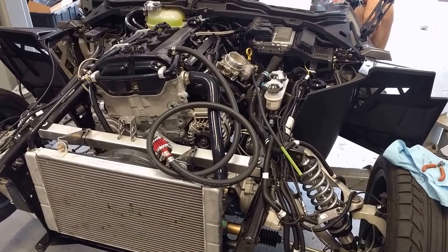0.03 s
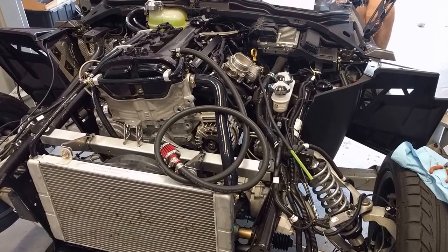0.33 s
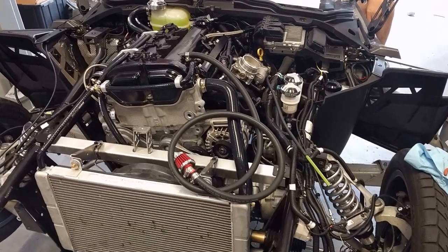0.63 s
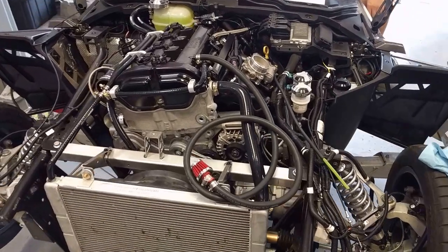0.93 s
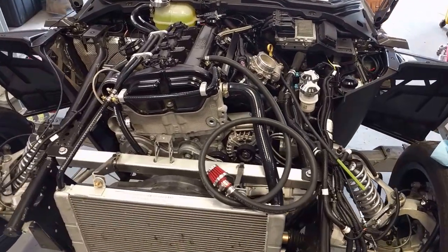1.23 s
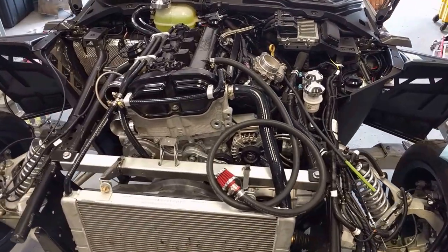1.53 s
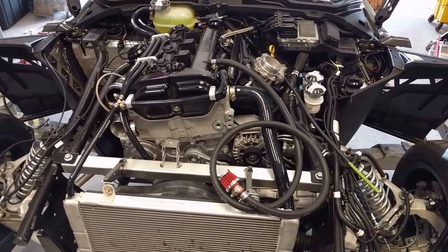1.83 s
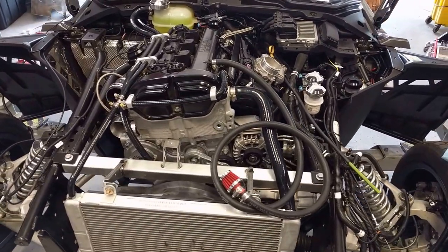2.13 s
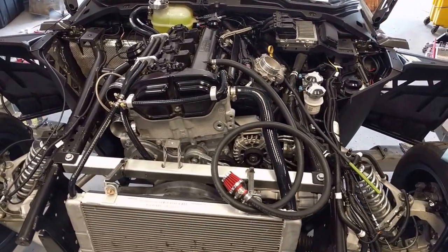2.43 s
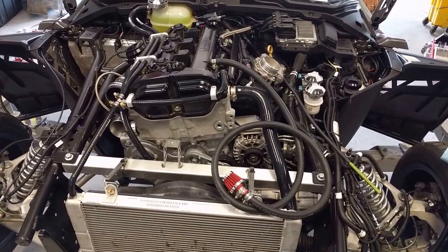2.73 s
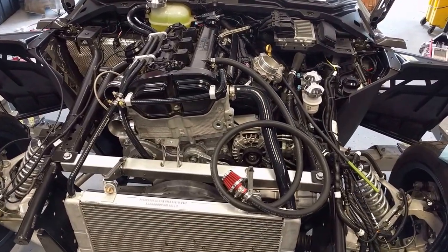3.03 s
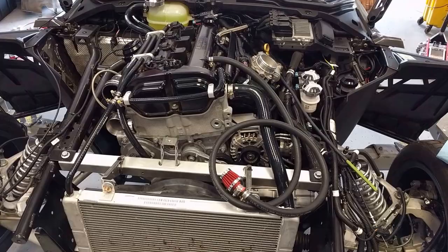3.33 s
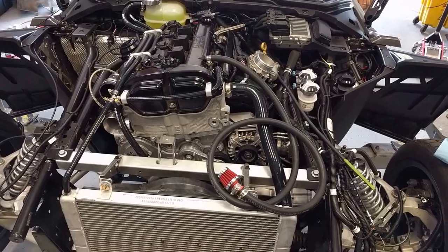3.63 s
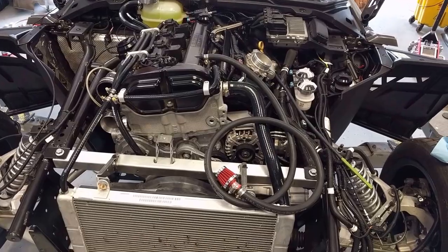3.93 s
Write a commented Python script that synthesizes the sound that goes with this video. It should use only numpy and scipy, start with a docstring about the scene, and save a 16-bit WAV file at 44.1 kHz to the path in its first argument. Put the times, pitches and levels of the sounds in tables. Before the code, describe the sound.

Heard from just above, an engine fires up after a quiet stretch of garage hum and buzz. A short starter grind leads into a rough exhaust roar that rises, dips and rises again, with ticking valves and metal clatter.

```python
"""A four-cylinder engine is started in a workshop, heard from just above the open engine bay.
First come room rumble, hiss, lamp buzz and an electric whine, with faint ringing, a ping and a knock.
At 1.9 s the starter clacks in and its pinion grinds on the ring gear while the cylinders puff air.
At 2.3 s the engine catches, then flares, sags and climbs to a fast idle. Each firing booms in the
silencer and barks in the pipe, while the valve gear ticks brightly and the block clatters."""
import sys
import numpy as np
from scipy import signal
from scipy.fft import rfft, irfft
from scipy.io import wavfile
from scipy.ndimage import uniform_filter1d

SR = 44100
rng = np.random.default_rng(int(sys.argv[2]) if len(sys.argv) > 2 else 0)


def transcribe(signal):
    """Save signal, clipped to [-1, 1], as a 16-bit WAV file at the path in sys.argv[1]."""
    frames = np.atleast_2d(signal).T
    limited = np.clip(frames, -1, 1)
    pcm = np.round(limited * 32767).astype(np.int16)
    wavfile.write(sys.argv[1], SR, pcm)


N = 176400
TIME_S = np.arange(N) / SR
CATCH_S, CATCH_RISE_S, HIT_RISE_S = 2.268, 0.0044, 0.0018


def undb(db):
    """Decibels to gain."""
    return 10 ** (np.asarray(db) / 20)

def unit(x):
    """Scale to rms 1."""
    return x / np.sqrt(np.mean(x ** 2) + 1e-18)

def unit_running(x):
    """Scale to rms 1 over the time the engine runs."""
    return x / np.sqrt(np.mean(x[int(CATCH_S * SR):] ** 2) + 1e-18)

def curve(rows):
    """Join (seconds, value) rows by straight lines."""
    return np.interp(TIME_S, *np.array(rows).T)

def noise():
    """White noise."""
    return rng.standard_normal(N)

def drift(rate_hz):
    """Smooth random motion of rms 1."""
    hold = int(SR / rate_hz)
    steps = np.repeat(noise()[:N // hold + 1], hold)
    return unit(uniform_filter1d(uniform_filter1d(steps, hold), hold)[:N])

def tone(hz, wander_hz=1.08, rate_hz=21.0, wander_db=1.2):
    """A sine unsteady in pitch and level, rms near 1."""
    gain = np.sqrt(2) * undb(wander_db * drift(14.63))
    return gain * np.sin(2 * np.pi * np.cumsum(hz + wander_hz * drift(rate_hz)) / SR)

def colour(x, response, size=16384):
    """Pass x through a minimum-phase response given as (Hz, dB) rows."""
    hz, db = np.array(response).T
    bins_hz = np.maximum(np.fft.rfftfreq(size, 1 / SR), 1)
    cepstrum = irfft(np.log(undb(np.interp(np.log(bins_hz), np.log(hz), db))))
    cepstrum[1:size // 2] *= 2
    cepstrum[size // 2 + 1:] = 0
    return signal.fftconvolve(x, irfft(np.exp(rfft(cepstrum))))[:N]

def impulses(times_s, gains):
    """One impulse at each time."""
    at = np.round(times_s * SR).astype(int)
    inside = (at >= 0) & (at < N)
    return np.bincount(at[inside], gains[inside], N)

def fade(x, decay_s):
    """Give each impulse an exponential tail."""
    return signal.lfilter([1], [1, -np.exp(-1 / (decay_s * SR))], x)

def strike(start_s, rise_s, decay_s):
    """An envelope that rises quickly and dies away."""
    age_s = np.maximum(TIME_S - start_s, 0)
    return (1 - np.exp(-age_s / rise_s)) * np.exp(-age_s / decay_s)

def hits(rows, body, rise_share=0.1):
    """Decaying noise bursts ring a body, tilted brighter for harder contact."""
    out = 0
    for start_s, db, decay_s, tilt in rows:
        ring = unit(colour(noise(), [(hz, gain_db + tilt * np.log2(hz)) for hz, gain_db in body]))
        out += undb(db) * strike(start_s, rise_share * decay_s, decay_s) * ring
    return out

def room(x, wet_db=-8.5, t60_s=0.7):
    """Add the short diffuse echo of the workshop."""
    t = TIME_S[:SR]
    tail = noise()[:SR] * np.exp(-np.log(1000) * t / t60_s) * (t > .006)
    return x + undb(wet_db) * signal.fftconvolve(x, tail / np.linalg.norm(tail))[:N]


# Background spectra. Each row: frequency in Hz, gain in dB.
RUMBLE_SPECTRUM = [(20, -36), (33, -22), (48, -2), (70, 1.5), (100, -3.5), (135, -6.5), (230, -12),
                   (350, -16), (500, -22), (1000, -25.5), (2000, -32), (4000, -37), (12000, -49.5)]
HISS_SPECTRUM = [(3000, -28), (5700, -9), (6400, -8), (7200, 0), (7700, 2.5), (8600, 5.5), (9200, -4),
                 (9800, -8), (12000, -14.5), (15500, -21)]
def room_noise(rumble_db=-42.5, hiss_db=-57.5):
    """Low rumble and thin hiss, both wavering slightly."""
    rumble = undb(rumble_db + drift(20)) * unit(colour(noise(), RUMBLE_SPECTRUM))
    hiss = undb(hiss_db + 0.76 * drift(6.1)) * unit(colour(noise(), HISS_SPECTRUM))
    return rumble + hiss

# Ballast spectrum. Each row: frequency in Hz, gain in dB.
BUZZ_SPECTRUM = [(2000, -28), (5000, -8), (5700, -6), (6100, 1.5), (6450, -2), (6800, 4), (7600, -1),
                 (8600, -2), (9300, -13), (12000, -30)]
def lamps(mains_hz=60, level_db=-57.5, odd_db=-12, scatter_db=1.5):
    """Lamp ballasts repeat one thin rasp every mains cycle; odd harmonics are weaker."""
    harmonics = np.arange(SR // mains_hz // 2 + 1)
    gains = undb(odd_db * (harmonics % 2) + scatter_db * rng.standard_normal(len(harmonics)))
    cycle = irfft(gains * np.exp(2j * np.pi * rng.random(len(harmonics))), SR // mains_hz)
    return undb(level_db) * unit(colour(np.resize(cycle, N), BUZZ_SPECTRUM))

# Whine partials. Each row: time in seconds, levels of harmonics 1, 2 and 3 in dB.
WHINE_DB = [(0, -82, -67, -74), (.35, -76, -62, -74), (.52, -75, -68, -77), (.77, -67, -64, -73),
            (.92, -78, -62, -75), (1.08, -78, -58, -71), (1.29, -81, -54, -78), (1.42, -80, -68, -73),
            (1.62, -73, -59, -68), (1.87, -76, -62, -68)]
# Whistle swells. Each row: time in seconds, level in dB.
WHISTLE_DB = [(.5, -80), (.77, -68), (.92, -79), (1.04, -69), (1.14, -67), (1.25, -77), (1.5, -76)]
def electrics(whine_hz=3617.6, whistle_hz=4517, hum_hz=235.4, hum_db=-55):
    """A wavering electric whine, a weaker whistle and a low hum."""
    levels = np.array(WHINE_DB)
    whine = sum(undb(curve(levels[:, [0, k]])) * tone(k * whine_hz) for k in (1, 2, 3))
    return whine + undb(curve(WHISTLE_DB)) * tone(whistle_hz) + undb(hum_db) * tone(hum_hz)

# Ringing partials. Each row: frequency in Hz, gain in dB.
TINKLE_PARTIALS = [(8990, 6), (10450, 1), (13950, 2), (15520, -4)]
def tinkle(rise_s=0.01, t60_s=0.42):
    """A faint high ringing swells twice and dies away."""
    decay_s = t60_s / np.log(1000)
    swells = undb(-59.5) * strike(0, rise_s, decay_s) + undb(-60) * strike(.105, rise_s, decay_s)
    return swells * sum(undb(db) * tone(hz, wander_hz=30, rate_hz=140) for hz, db in TINKLE_PARTIALS)

def ping(start_s=.32, hz=1720, level_db=-43):
    """One small, quickly damped tone."""
    return undb(level_db) * strike(start_s, HIT_RISE_S, decay_s=0.0049) * tone(hz)

# Knock. Each row: start in seconds, level in dB, decay in seconds, tilt in dB per octave.
KNOCK_HITS = [(1.65, -44, 0.024, -2.5)]
# Knocked body. Each row: frequency in Hz, gain in dB.
KNOCK_RESPONSE = [(300, -22), (1000, 0), (1700, 0), (2600, -11), (6000, -12), (12000, -30)]
def knock():
    """A soft knock before the start."""
    return hits(KNOCK_HITS, KNOCK_RESPONSE)

# Loose parts. Each row: start in seconds, frequency in Hz, level in dB, decay in seconds.
CLANK_RINGS = [(2.311, 2710, -28, .016), (2.314, 3750, -28.5, .018), (2.444, 1660, -30.5, .02)]
def clanks():
    """Loose metal parts ring briefly and unsteadily as the engine rocks."""
    return sum(undb(db) * strike(start_s, HIT_RISE_S, decay_s) * tone(hz, wander_hz=55, rate_hz=150)
               for start_s, hz, db, decay_s in CLANK_RINGS)

# Casting resonances. Each row: frequency in Hz, bandwidth in Hz, gain in dB.
CASTING_MODES = [(960, 90, -6), (1300, 50, -5), (2070, 50, 2), (2600, 110, 1), (3000, 60, -2),
                 (4780, 150, 0), (5520, 100, 0), (6210, 50, -1), (6680, 80, 3), (7340, 70, 5),
                 (8090, 90, 2), (8370, 90, 4), (8700, 70, 5), (9310, 70, 4)]
def castings(x, wander_db=4.5):
    """The engine's castings ring narrowly; each mode comes and goes as the contact shifts."""
    out = 0
    for hz, width_hz, db in CASTING_MODES:
        ring = signal.lfilter(*signal.iirpeak(hz, hz / width_hz, fs=SR), x)
        out += undb(db + wander_db * drift(14)) * ring
    return out

# Tooth rate, sagging on compressions. Each row: time in seconds, rate in Hz.
MESH_HZ = [(1.875, 200), (1.96, 300), (2.04, 285), (2.12, 330), (2.2, 310), (2.3, 370)]
# Grind envelope. Each row: time in seconds, level in dB.
STARTER_DB = [(1.875, -24), (1.89, -40), (1.93, -24), (1.97, -24), (2.04, -21.5), (2.09, -23.5),
              (2.148, -24.5), (2.16, -21), (2.21, -19.5), (2.26, -22.5), (2.31, -38), (2.55, -26.5),
              (2.68, -52)]
# Starter body. Each row: frequency in Hz, gain in dB.
STARTER_RESPONSE = [(120, -37), (250, -17.5), (480, -7), (620, -20), (850, -15), (1300, -12), (1800, -11),
                    (2200, -13.5), (2900, -8.5), (3700, -8), (4800, -3.5), (5900, -3.5), (6600, 2),
                    (8300, 3.5), (9500, -2.5), (10600, -15), (12500, -23), (15500, -38)]
def starter(count=1500, jitter_share=.007, scatter_db=2.8, wash_db=3, whine_db=-1.5, ring_db=-3):
    """Pinion teeth grind and whine on the ring gear, ringing the starter body and the castings."""
    timing, force = rng.standard_normal((count, 2)).T
    teeth_passed = np.cumsum(curve(MESH_HZ)) / SR
    times_s = np.interp(np.arange(count) + jitter_share * timing, teeth_passed, TIME_S, right=2 * N / SR)
    teeth = impulses(times_s, undb(scatter_db * force))
    grind = unit((unit(fade(teeth, decay_s=0.0032)) + undb(wash_db)) * noise())
    tooth_burst = noise() * strike(0, HIT_RISE_S, decay_s=0.003)
    whine = unit(signal.fftconvolve(teeth, tooth_burst)[:N])  # one burst repeated gives a pitch
    mesh = grind + undb(whine_db) * whine
    body = unit(unit(colour(mesh, STARTER_RESPONSE)) + undb(ring_db) * unit(castings(mesh)))
    return body * undb(curve(STARTER_DB)) * (TIME_S > STARTER_DB[0][0])

# Air puffs. Each row: centre in seconds, level in dB, Gaussian width in seconds.
AIR_PUFFS = [(1.954, -34, 0.02), (2.036, -35, 0.028), (2.208, -27, 0.019)]
def puffs(hz=77):
    """The cylinders pump out soft puffs of air while cranking."""
    out = 0
    for centre_s, db, width_s in AIR_PUFFS:
        t = TIME_S - centre_s
        out += undb(db) * np.exp(-.5 * (t / width_s) ** 2) * np.sin(2 * np.pi * hz * t)
    return np.sqrt(2) * out

# Clacks. Each row: start in seconds, level in dB, decay in seconds, tilt in dB per octave.
CLACK_HITS = [(1.876, -21, 0.044, -3), (1.896, -12, 0.0099, 1), (1.914, -7.5, 0.0075, -0.5),
              (2.152, -14.5, 0.01, 0), (2.276, -16.5, .003, 6), (2.314, -15.5, 0.012, -0.5),
              (2.344, -14, 0.0032, 2), (2.92, -21, 0.0054, 5)]
# Struck metal. Each row: frequency in Hz, gain in dB.
CLACK_RESPONSE = [(150, -15), (500, -12.5), (1000, -4.5), (1600, -6), (2400, 2), (3600, -9.5), (5200, 0.5),
                  (7000, 5), (8500, 10), (10500, -4), (12500, -18), (15500, -17)]
def clacks():
    """Metal clacks from the solenoid, the pinion and the early firings."""
    return hits(CLACK_HITS, CLACK_RESPONSE)

# Engine speed. Each row: time in seconds, firing rate in Hz.
FIRING_HZ = [(2.28, 37), (2.35, 39.5), (2.414, 50.7), (2.5, 60.5), (2.57, 63.6), (2.644, 60.2),
             (2.73, 54.9), (2.9, 44.0), (3.0, 43.6), (3.238, 48.5), (3.39, 53.6), (3.5, 60.2),
             (3.596, 63.8), (3.658, 64.8), (3.75, 65.4), (4.0, 66.2)]
def cycle_times(share, count=120):
    """Seconds at which the crank passes a given share of each firing interval."""
    running = TIME_S >= CATCH_S
    firings = np.cumsum(curve(FIRING_HZ)[running]) / SR
    return np.interp(np.arange(count) + share, firings, TIME_S[running], right=2 * N / SR)

# Valve-gear impacts. Each row: position as a share of the firing interval, gain in dB.
VALVE_IMPACTS = [(0.051, -4), (0.299, 2.5), (.52, -4.5), (0.782, -1.5)]
def rattle(body, decay_s, wash_db, jitter_s=.0007, scatter_db=4.8):
    """Four impacts per firing interval ring a body, over a wash of chain noise."""
    train = 0
    for share, db in VALVE_IMPACTS:
        times_s = cycle_times(share)
        timing, force = rng.standard_normal((len(times_s), 2)).T
        train += impulses(times_s + jitter_s * timing, undb(db + scatter_db * force))
    started = curve([(CATCH_S, 0), (CATCH_S + CATCH_RISE_S, 1)])
    envelope = unit_running(fade(train, decay_s)) + undb(wash_db) * started
    return unit_running(colour(envelope * noise(), body))

# Engine block. Each row: frequency in Hz, gain in dB.
BLOCK_RESPONSE = [(200, -10.5), (600, -1), (900, 1), (1200, 0), (1600, 2.5), (2100, 1.5), (2400, 0),
                  (2750, 0), (3500, -0.5), (5000, 1.5), (6200, 1), (8000, -0.5), (11000, -16.5),
                  (15500, -13)]
# Clatter envelope. Each row: time in seconds, level in dB.
CLATTER_DB = [(2.27, -30), (2.35, -27.5), (2.58, -31), (2.64, -31), (2.9, -36), (3.1, -36), (3.4, -34),
              (3.6, -32), (3.75, -34), (4.0, -35.5)]
def block_clatter(ring_db=-10.5):
    """The block clatters, duller than the valves, and rings the castings."""
    clatter = rattle(BLOCK_RESPONSE, decay_s=0.0053, wash_db=9)
    ring = undb(ring_db) * unit_running(castings(clatter))
    return unit_running(clatter + ring) * undb(curve(CLATTER_DB))

# Valve cover. Each row: frequency in Hz, gain in dB.
COVER_RESPONSE = [(2500, -21), (5000, -25), (6800, -15), (7700, -5.5), (8300, 2.5), (8800, -3), (9600, -11),
                  (11000, -19), (13000, -27), (15500, -29)]
# Tick envelope. Each row: time in seconds, level in dB.
TICK_DB = [(2.27, -18), (2.31, -22.5), (2.35, -18.5), (2.55, -26), (2.8, -27.5), (2.95, -29.5),
           (3.1, -33.5), (3.3, -30.5), (3.58, -28), (3.75, -30), (4.0, -30.5)]
def valve_ticks():
    """The valve gear ticks brightly through its cover."""
    return rattle(COVER_RESPONSE, decay_s=0.0034, wash_db=3) * undb(curve(TICK_DB))

def engine_orders(orders, response, firings, scatter_db, dispersion_rad=0.436):
    """Orders glide through the exhaust's resonances, which ring on and shift their timing; rms near 1."""
    log_firing_hz = np.log(curve(FIRING_HZ))
    hz, db = np.array(response).T
    out = power = 0
    for order, order_db in orders:
        # Half orders lag a quarter cycle: alternate firings differ in timing.
        lag = dispersion_rad * (order - 1) ** 2 + np.pi * (order % 1)
        out += undb(order_db + scatter_db * drift(40)) * np.cos(2 * np.pi * order * firings - lag)
        response_db = np.interp(log_firing_hz + np.log(order), np.log(hz), db)
        power += undb(order_db + response_db) ** 2 / 2
    return colour(out, response) / np.sqrt(power)

# Orders; halves come from unequal cylinders. Each row: multiple of the firing rate, gain in dB.
SILENCER_ORDERS = [(.5, -16), (1, 1), (1.5, -23), (2, 1.5), (2.5, -15), (3, 0)]
PIPE_ORDERS = [(4, 3), (4.5, -8), (5, 3.5), (5.5, -1.5), (6, 1), (6.5, -4), (7, -3), (7.5, -4), (8, -1),
               (9, -3), (10, -1)]
# Exhaust resonances and gas-noise spectra. Each row: frequency in Hz, gain in dB.
SILENCER_RESPONSE = [(22, -33), (36, -25), (46, -10), (56, -8.5), (65, 3.5), (85, 6.5), (110, -3.5),
                     (130, -3), (160, -12.5), (197, -7), (280, -32)]
PIPE_RESPONSE = [(80, -10), (150, -11), (197, 0), (220, -3), (248, 2), (272, -3), (295, 4), (328, -2.5),
                 (365, 5), (410, -8.5), (450, -15), (490, -9), (560, -20), (660, -15.5), (1100, -37.5)]
CHUFF_SPECTRUM = [(25, -42), (45, -2.5), (72, 3), (100, 3.5), (170, -4.5), (300, -8), (800, -47.5)]
RUSH_SPECTRUM = [(80, -2), (150, -4), (195, -4), (280, 3), (365, 3.5), (430, -1.5), (530, -9.5), (600, -10),
                 (670, -7), (780, -18), (1100, -18), (3000, -56.5)]
# Envelopes; the bark falls away off load. Each row: time in seconds, level in dB.
BOOM_DB = [(2.27, -17.5), (2.32, -14.5), (2.37, -9.5), (2.445, -16.5), (2.53, -13), (2.585, -13),
           (2.655, -20.5), (2.695, -15), (2.76, -16), (2.905, -16), (2.94, -12), (3.15, -13.5),
           (3.35, -14.5), (3.45, -12.5), (3.7, -11), (4.0, -14.5)]
BARK_DB = [(2.27, -35), (2.32, -32), (2.35, -27.5), (2.48, -21.5), (2.56, -23), (2.62, -34), (2.912, -36),
           (2.922, -23), (3.0, -26.5), (3.3, -24), (3.56, -21), (3.68, -23.5), (4.0, -23.2)]
WARM_SCATTER_DB, COLD_EXTRA_SCATTER_DB, SETTLE_S = .8, 2.0, .7
FIRST_FIRING_SHARE, GAS_DECAY_SHARE, WOBBLE_SHARE_PER_DB = 0.299, .6, .009  # of a firing interval
def exhaust(warm_chuff_db=-25, warm_rush_db=-13.5, cold_extra_rush_db=9):
    """Firings boom in the silencer and bark in the pipe with a rush of gas, ragged at first."""
    age_s = np.maximum(TIME_S - CATCH_S, 0)
    cold = np.exp(-age_s / SETTLE_S)
    scatter_db = WARM_SCATTER_DB + COLD_EXTRA_SCATTER_DB * cold
    crank_wobble = WOBBLE_SHARE_PER_DB * scatter_db * drift(30)
    firings = np.cumsum(curve(FIRING_HZ) * (age_s > 0)) / SR - FIRST_FIRING_SHARE + crank_wobble
    gas = np.exp(-(firings % 1) / GAS_DECAY_SHARE) * noise()
    chuff = undb(warm_chuff_db) * scatter_db / WARM_SCATTER_DB * unit(colour(gas, CHUFF_SPECTRUM))
    rush = undb(warm_rush_db + cold_extra_rush_db * cold) * unit(colour(gas, RUSH_SPECTRUM))
    boom = engine_orders(SILENCER_ORDERS, SILENCER_RESPONSE, firings, scatter_db) + chuff
    bark = engine_orders(PIPE_ORDERS, PIPE_RESPONSE, firings, scatter_db) + rush
    started = np.minimum(age_s / CATCH_RISE_S, 1)
    return started * (boom * undb(curve(BOOM_DB)) + bark * undb(curve(BARK_DB)))

def scene():
    """The workshop, the same in both channels; only the engine bay's sounds echo."""
    engine = exhaust() + room(block_clatter() + valve_ticks() + starter() + puffs() + clacks() + clanks())
    mono = engine + electrics() + lamps() + room_noise() + tinkle() + ping() + knock()
    return np.array([mono, mono])

def record(dry):
    """A steep low-pass cuts the top above 15.7 kHz."""
    return signal.sosfilt(signal.ellip(10, .2, 80, 15700, fs=SR, output="sos"), dry)


dry = scene()
out = record(dry)
transcribe(out)
```